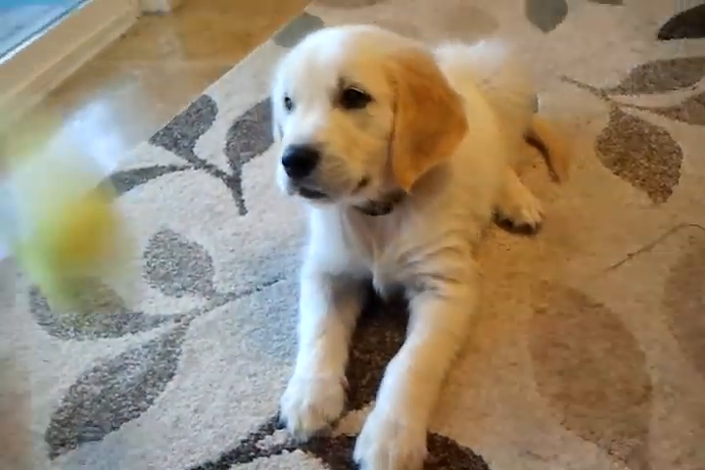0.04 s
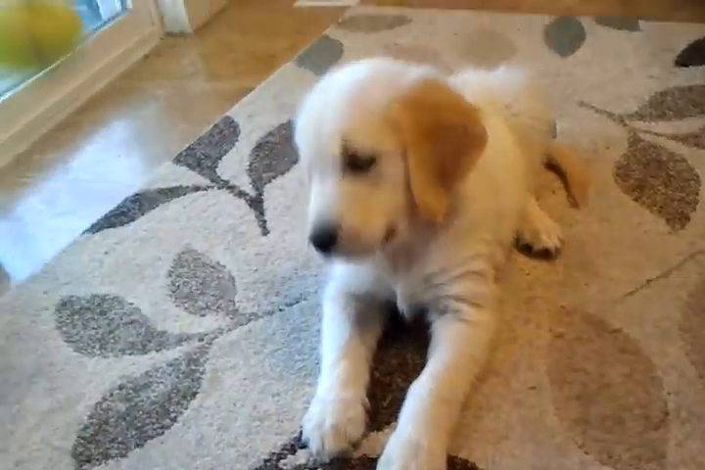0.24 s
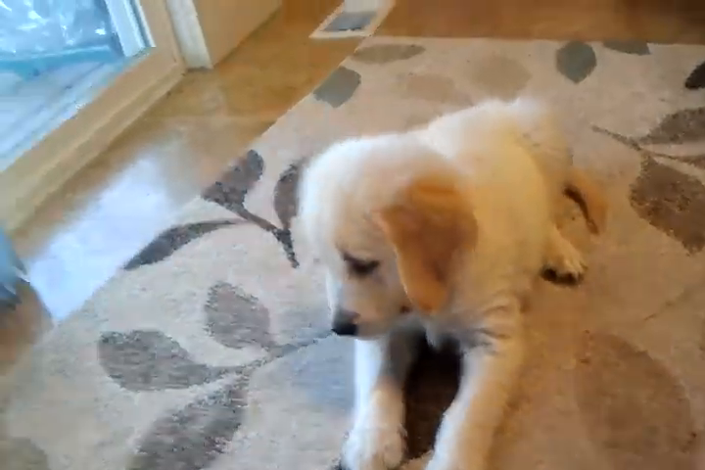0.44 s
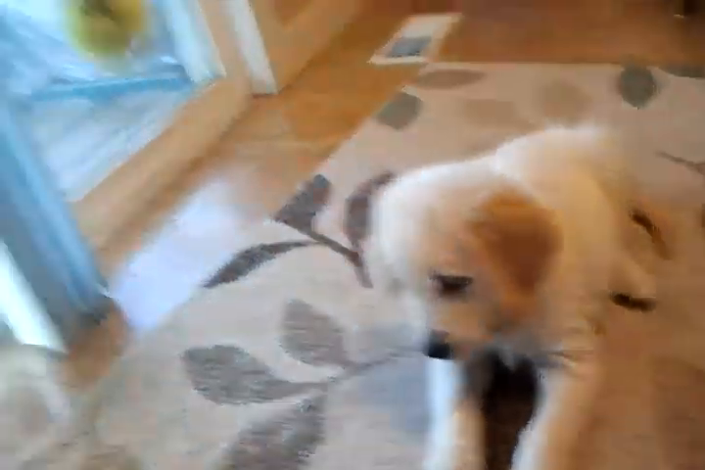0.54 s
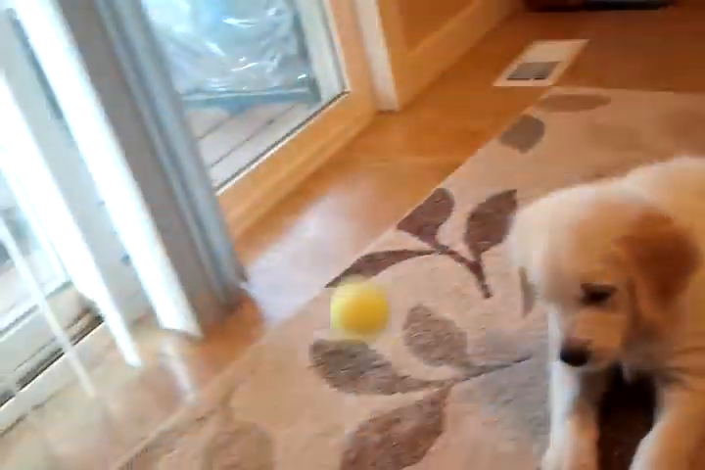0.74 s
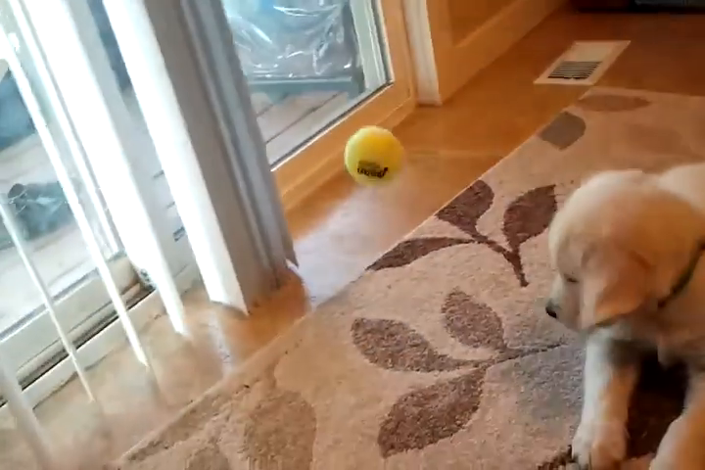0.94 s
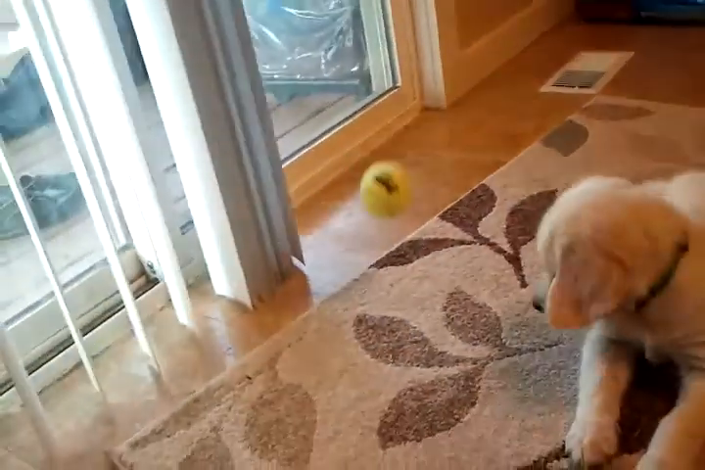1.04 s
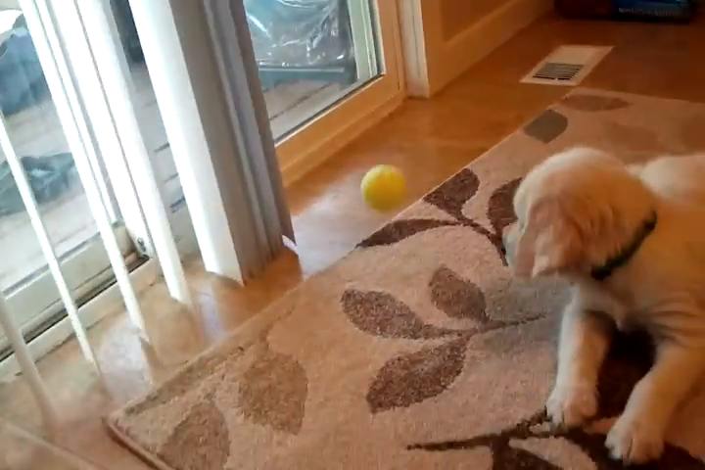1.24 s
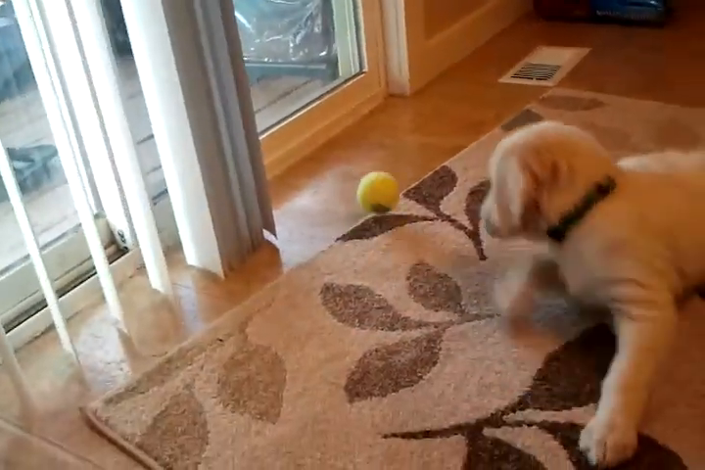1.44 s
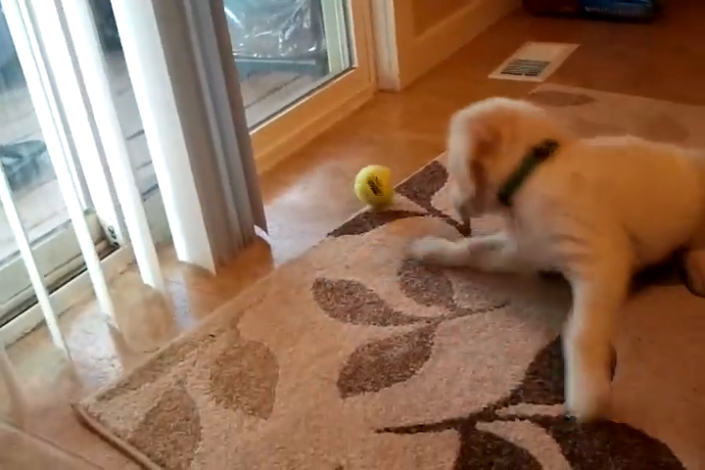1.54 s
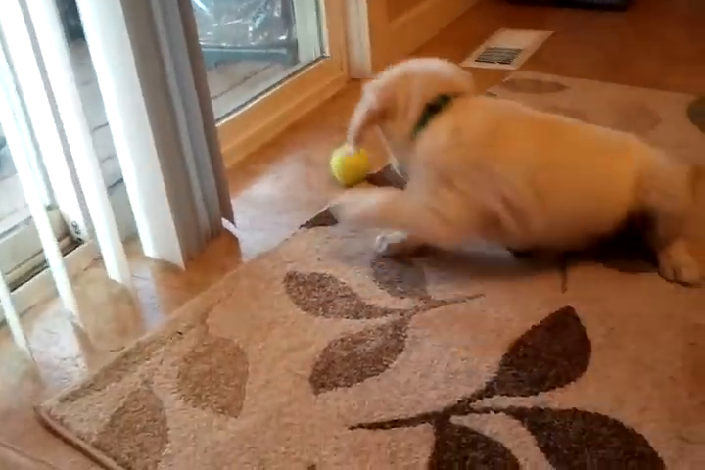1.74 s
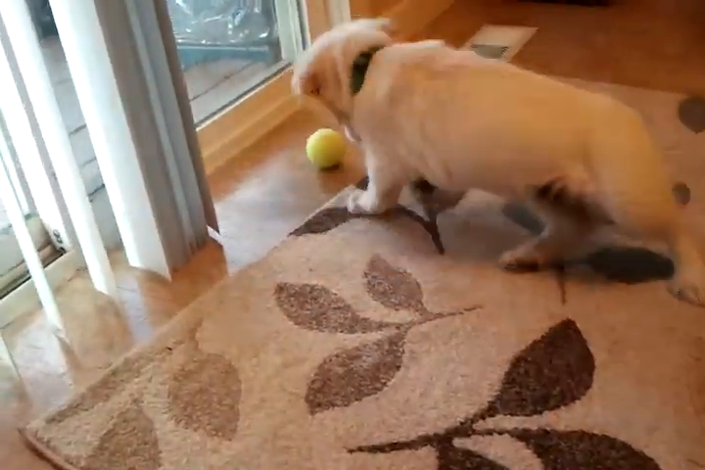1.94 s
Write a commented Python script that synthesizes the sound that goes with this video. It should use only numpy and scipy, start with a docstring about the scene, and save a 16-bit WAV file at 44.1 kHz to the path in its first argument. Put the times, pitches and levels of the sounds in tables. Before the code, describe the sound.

A tennis ball bounces on a wooden floor, first at 0.2 seconds with a loud, dry, overloaded pop and a short room ring. A softer bounce follows at 0.85 seconds, another at 1.3 lightly rattles a door frame, and a dull, faint landing on a rug comes at 1.5. A puppy's paws and collar tap very faintly throughout, with a soft scuff around 1.7, over quiet room tone.

```python
"""A tennis ball bounces on a wooden floor and lands on a rug, where a puppy goes after it.
The place is a quiet living room, heard through one microphone. Each bounce is a deep thump of the
floor, a crack of the ball's shell and a short room tail; one also sets the door frame clattering.
Paws, collar and fur sit far below the ball in level, over a steady room tone.
The hardest thumps overload the microphone, whose bass cut turns them into a dry pop."""
import sys
import numpy as np
from scipy import signal
from scipy.fft import rfft, irfft
from scipy.io import wavfile

SR = 44100
rng = np.random.default_rng(int(sys.argv[2]) if len(sys.argv) > 2 else 0)


def waveform_to_disk(signal):
    """Save audio, clipped to [-1, 1], as 16-bit WAV at the path in sys.argv[1]."""
    frames = np.transpose(np.atleast_2d(signal))
    scaled = np.clip(frames, -1, 1) * 32767
    samples = np.round(scaled).astype(np.int16)
    wavfile.write(sys.argv[1], SR, samples)


N = 88200
T = np.arange(N) / SR
HZ = np.fft.rfftfreq(N, 1 / SR)

# colour of the room tone (frequency [Hz], relative density [dB])
AIR_SPECTRUM = [(25, 17.5), (60, 21.5), (130, 14.5), (200, 16.5), (330, 12), (700, 6), (1100, -0.5),
                (1500, -5), (2200, -5.5), (3200, -8), (6300, -10.5), (8000, -16.5)]
# wavering of the room tone's treble (time [s], gain [dB])
HISS_GAIN = [(0, -3), (.2, -0.5), (.4, 2), (.75, -1.5), (1.05, 0), (1.17, 2), (1.45, 0.5), (2, 1.5)]
# reverberation of the living room (frequency [Hz], t60 [s])
ROOM_T60 = [(80, 0.58), (250, 0.41), (700, 0.32), (1500, 0.56), (3500, 0.41), (8000, 0.87)]
# taps of paws and collar (time [s], level [dB], pitch [Hz], rise [s])
TAPS = [(0.1223, -31, 990, 0.00073), (0.1224, -26.5, 320, 0.00078), (0.721, -44.5, 1970, 0.00048),
        (0.7805, -36, 600, 0.0005), (1.1600, -36, 193, 0.0067), (1.371, -37.5, 4800, 0.0001),
        (1.676, -36, 900, 0.00059), (1.6700, -30, 87, 0.0086), (1.791, -45, 2730, 0.0029),
        (1.876, -34, 138, 0.0082)]
# brushing of fur and cloth (time [s], rise [s], decay [s], level [dB], upper edge [Hz])
BRUSHES = [(0.470, 0.031, 0.097, -46, 2400), (1.110, 0.06, 0.05, -49, 916),
           (1.662, .02, 0.065, -48.5, 2300)]
# colours of that brushing and of paws sliding on the rug (frequency [Hz], relative density [dB])
BRUSH_SPECTRUM = [(100, -0.5), (300, -4.5), (600, 8.5), (1200, 2.5), (2200, 2.5), (8000, -18)]
SCUFF_SPECTRUM = [(500, -25), (2000, -4), (4000, -1.5), (6500, -3.5), (8000, -6.5)]
# colours of the room's answer to thump and crack (frequency [Hz], relative density [dB])
BOOM_SPECTRUM = [(30, -26), (60, -12), (100, -4), (170, 2.5), (350, -14), (700, -25.5), (1400, -43.5),
                 (4000, -67)]
TAIL_SPECTRUM = [(100, -16), (400, -5), (800, 6.5), (1300, 0.5), (2300, -0.5), (3500, -4), (5000, -15),
                 (8000, -30.5)]
# modes of floor and room, door frame and ball's shell (frequency [Hz], relative level [dB], t60 [s])
FLOOR_MODES = [(127, -13, 0.25), (186.4, -6, .33), (197.7, -11, 0.56), (237.6, -9, 0.51), (266, -10, 0.53),
               (323, -8.5, 0.34), (456, -25.5, 0.22), (560.5, -19.5, 0.2), (600, -24, 0.066),
               (724.4, -20, 0.17)]
DOOR_MODES = [(818, -6.5, 0.34), (1152, -7.5, .3), (1310, -4, .4), (1366, -1.5, 0.26), (1510, -0.5, 0.084),
              (1554, 0, 0.16), (1733, -7, 0.24), (1960, -0.5, 0.13), (2005, -3, 0.23), (2243, -7, 0.21)]
SHELL_MODES = [(505, -14, 0.032), (900, -11, 0.024), (1075, -11, 0.05), (1240, -17, 0.033),
               (1880, -11, 0.023), (2240, -2.5, 0.0072), (3743, -4.5, 0.0056), (4540, -6.5, 0.0057),
               (5410, -9.5, 0.0058)]
# colour of the shell's snap (frequency [Hz], relative density [dB])
SNAP_SPECTRUM = [(300, -2), (1000, 7), (2000, -1), (3000, -3.5), (4600, -4.5), (6000, -12), (8000, -24)]
# reflections of the crack off nearby surfaces (delay [s], gain [dB])
ECHOES = [(.0024, -15), (.0068, -17), (.0082, -19), (0.0092, -9), (0.0146, -14.5)]
# the ball's landings (time [s], thump gain [dB], thump pitch [Hz], thump rise [s], boom gain [dB],
# crack gain [dB], crack's upper edge [Hz], room tail gain [dB])
BOUNCES = [(0.2292, 11.5, 112.1, 0.00653, -12.5, -9, 2800, -41),
           (0.8494, -0.5, 132.7, .0054, -20, -20, 6840, -39),
           (1.2650, -11, 139, 0.0056, -31, -21.5, 6460, -36.5),
           (1.517, -22, 130, 0.0078, -37.5, -57, 2000, -57.5)]

AIR_DB, HISS_FROM_HZ = -45, 1100
SCUFF_S, SCUFF_WIDTH_S, SCUFF_DB = 1.742, 0.076, -51
TAIL_RISE_S, BOOM_RISE_S, RUMBLE_GAIN_DB = 0.0035, 0.0043, 1.5
DOOR_S, DOOR_GAIN_DB = 1.2705, -41
SNAP_GAIN_DB, SNAP_RISE_S, CRACK_LAG_S = -3, 0.001, 0.00109
GLIDE_PER_S = 4.56  # share of its starting pitch that the thump gains each second
OVERLOAD_CEILING, OVERLOAD_KNEE = 0.6, 21
BASS_CUTS_HZ, TREBLE_CUT_HZ, BAND_LIMIT_HZ = (472, 1446), 6740, 8600


def amp(db):
    """Decibels to gain."""
    return 10 ** (np.asarray(db) / 20)


def read(points, hz):
    """Reads a table on a log-frequency axis."""
    f, value = np.transpose(points)
    return np.interp(np.log(hz + 1), np.log(f + 1), value)


def add(mix, start_s, sound):
    """Mixes a sound in at a time."""
    part = mix[max(round(start_s * SR), 0):][:len(sound)]
    part += sound[:len(part)]


def below(edge_hz):
    """Gain of a steep roll-off above an edge."""
    return 1 / np.sqrt(1 + (HZ / edge_hz) ** 12)


def noise(spectrum, rolloff=1):
    """Noise of unit level with the given colour."""
    white = rfft(rng.standard_normal(N))
    x = irfft(white * amp(read(spectrum, HZ)) * rolloff, N)
    return x / x.std()


def ring(modes):
    """Dying sines of a struck object."""
    return sum(amp(db - 60 * T / t60) * np.sin(2 * np.pi * hz * T) for hz, db, t60 in modes)


def pulse(rise_s):
    """Envelope that peaks at 1 after its rise, then dies away."""
    return T / rise_s * np.exp(1 - T / rise_s)


def room_tone():
    """Steady air around the microphone; its treble wavers a little."""
    air = amp(AIR_DB) * noise(AIR_SPECTRUM)
    low = irfft(rfft(air) * below(HISS_FROM_HZ), N)
    waver = amp(np.interp(T, *np.transpose(HISS_GAIN)))
    return low + (air - low) * waver


def room_tail(spectrum):
    """Diffuse sound of the room builds up quickly and dies at each band's own speed."""
    hz, t, bands = signal.stft(noise(spectrum), SR, nperseg=512)
    decay = amp(-60 * t / read(ROOM_T60, hz)[:, None])
    tail = signal.istft(bands * decay, SR, nperseg=512)[1][:N]
    return tail * (1 - np.exp(-(T / TAIL_RISE_S) ** 2))


def puppy():
    """Faint at the microphone: paws scuff the rug, paws and collar tap, fur and cloth brush."""
    slide = np.exp(-((T - SCUFF_S) / SCUFF_WIDTH_S) ** 2 / 2)
    out = amp(SCUFF_DB) * noise(SCUFF_SPECTRUM) * slide
    for start_s, db, hz, rise_s in TAPS:
        add(out, start_s, amp(db) * pulse(rise_s) * np.sin(2 * np.pi * hz * T))
    for start_s, rise_s, decay_s, db, edge_hz in BRUSHES:
        stroke = np.minimum(T / rise_s, 1) * np.exp(-np.maximum(T - rise_s, 0) / decay_s)
        add(out, start_s, amp(db) * stroke * noise(BRUSH_SPECTRUM, below(edge_hz)))
    return out


def room_boom():
    """Floor and room take up the thump and ring on."""
    rumble = amp(RUMBLE_GAIN_DB) * room_tail(BOOM_SPECTRUM)
    return (rumble - ring(FLOOR_MODES)) * (1 - np.exp(-T / BOOM_RISE_S))


def floor_thump(hz, rise_s):
    """The floor gives and swings two or three times, its pitch climbing as the ball leaves."""
    phase = 2 * np.pi * hz * T * (1 + GLIDE_PER_S * T / 2)
    return -pulse(rise_s) ** 2 * np.sin(phase)


def shell_crack(edge_hz):
    """The shell snaps and rings briefly; nearby surfaces throw it back to the microphone."""
    shell = ring(SHELL_MODES[::2]) - ring(SHELL_MODES[1::2])  # modes alternate in polarity
    snap = amp(SNAP_GAIN_DB) * noise(SNAP_SPECTRUM) * pulse(SNAP_RISE_S)
    direct = signal.lfilter(*signal.butter(2, edge_hz, fs=SR), shell + snap)
    out = direct.copy()
    for delay_s, db in ECHOES:
        add(out, delay_s, amp(db) * direct)
    return out


def ball():
    """Each bounce thumps, booms and cracks into the room; one rings the door frame with a hollow clatter."""
    out = np.zeros(N)
    for start_s, thump_db, hz, rise_s, boom_db, crack_db, edge_hz, tail_db in BOUNCES:
        thump = amp(thump_db) * floor_thump(hz, rise_s)
        add(out, start_s, thump + amp(boom_db) * room_boom())
        crack = amp(crack_db) * shell_crack(edge_hz)
        add(out, start_s + CRACK_LAG_S, crack + amp(tail_db) * room_tail(TAIL_SPECTRUM))
    add(out, DOOR_S, amp(DOOR_GAIN_DB) * ring(DOOR_MODES))
    return out


def scene():
    """Ball and puppy over the room tone, in mono, as they reach the microphone."""
    return (ball() + puppy() + room_tone())[None]


def record(dry):
    """The microphone overloads on the thumps; two bass cuts, a treble cut and a band limit follow."""
    x = dry / (1 + abs(dry / OVERLOAD_CEILING) ** OVERLOAD_KNEE) ** (1 / OVERLOAD_KNEE)
    for hz in BASS_CUTS_HZ:
        x = signal.lfilter(*signal.butter(1, hz, "high", fs=SR), x)
    x = signal.sosfilt(signal.butter(10, TREBLE_CUT_HZ, fs=SR, output="sos"), x)
    band_limit = signal.firwin(255, BAND_LIMIT_HZ, window=("kaiser", 8), fs=SR)
    return signal.oaconvolve(x, band_limit[None], "same")


dry = scene()
out = record(dry)
waveform_to_disk(out)
```